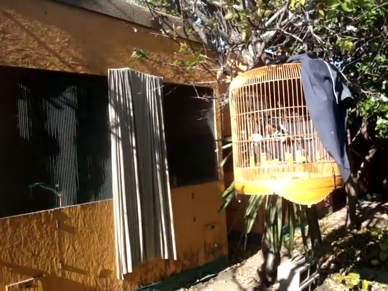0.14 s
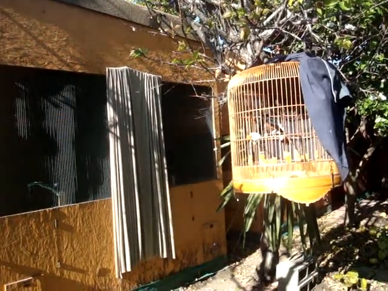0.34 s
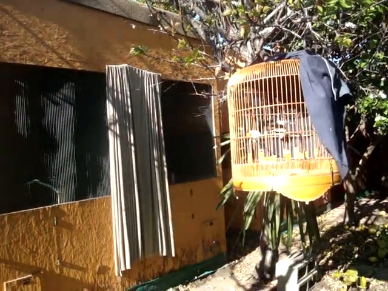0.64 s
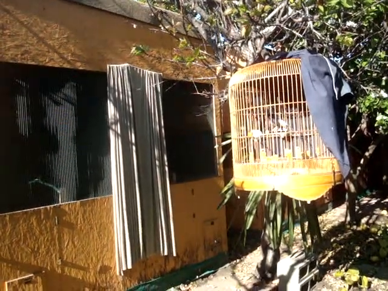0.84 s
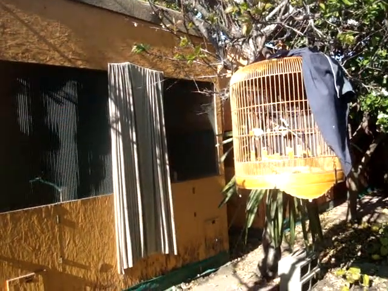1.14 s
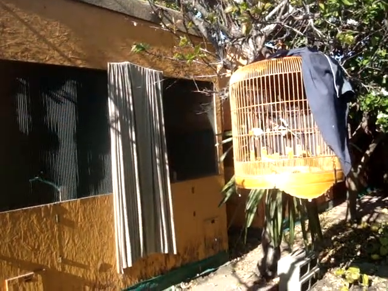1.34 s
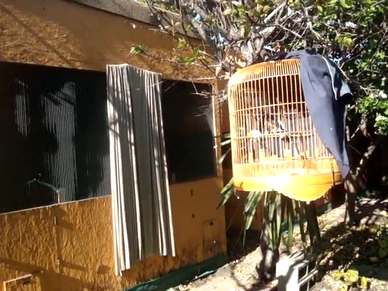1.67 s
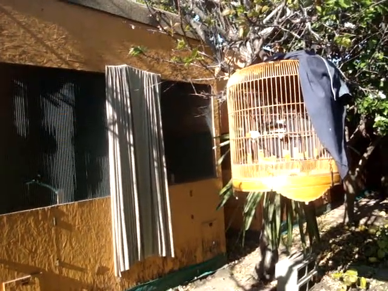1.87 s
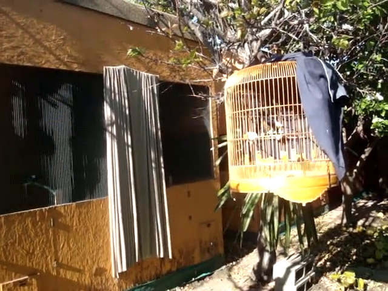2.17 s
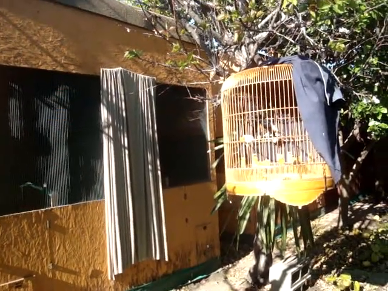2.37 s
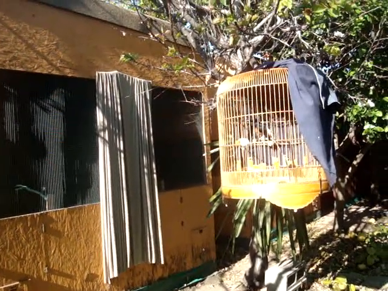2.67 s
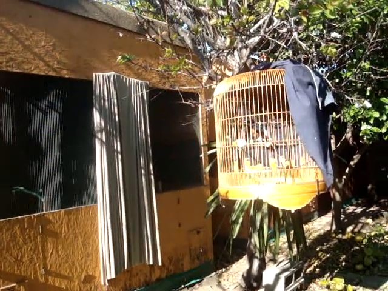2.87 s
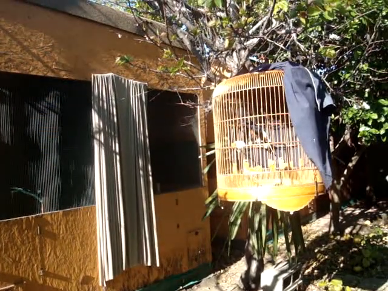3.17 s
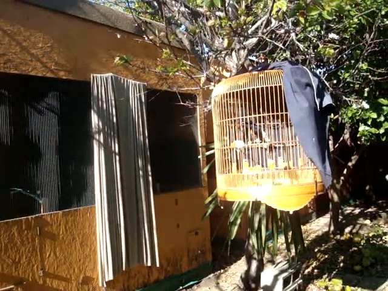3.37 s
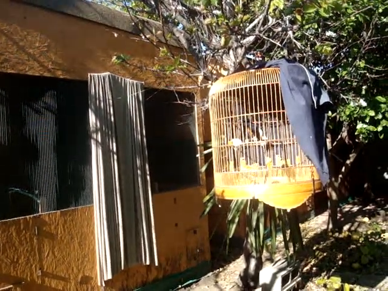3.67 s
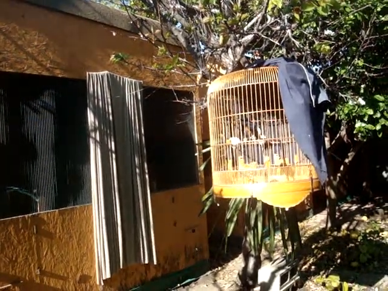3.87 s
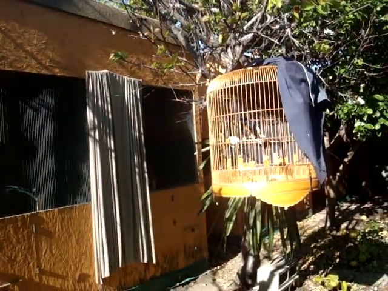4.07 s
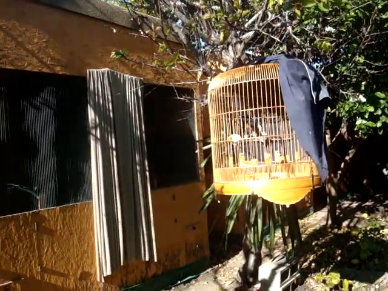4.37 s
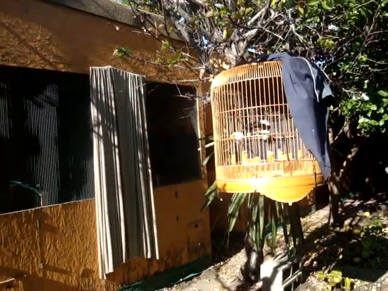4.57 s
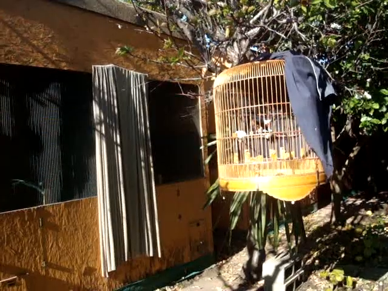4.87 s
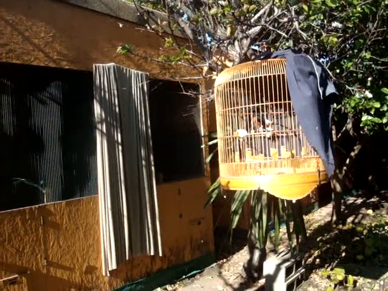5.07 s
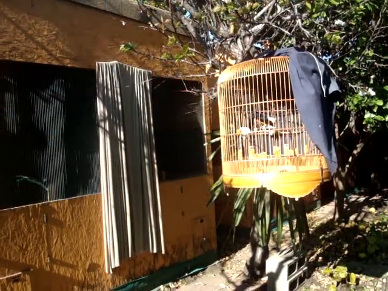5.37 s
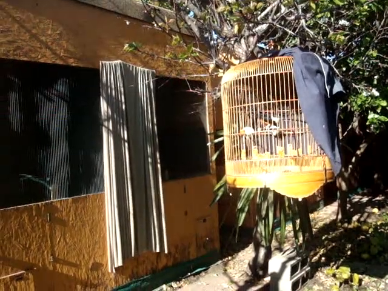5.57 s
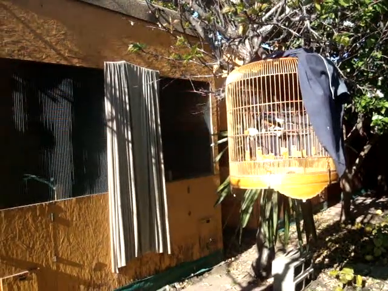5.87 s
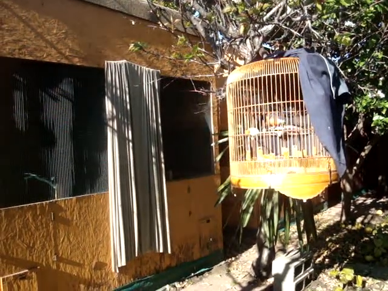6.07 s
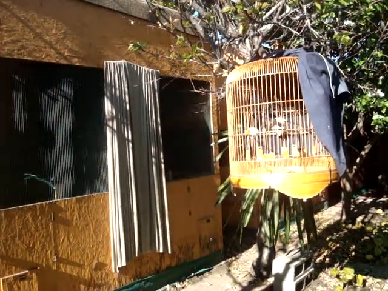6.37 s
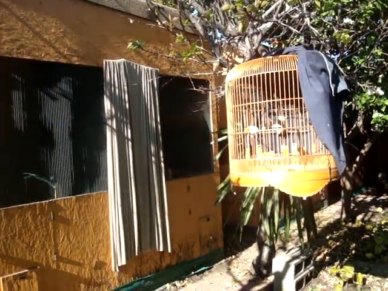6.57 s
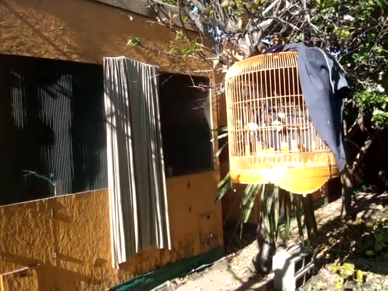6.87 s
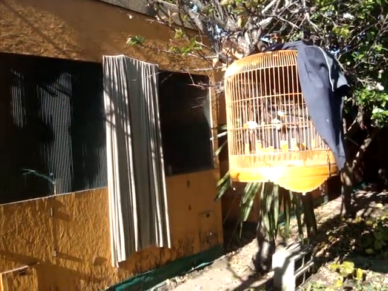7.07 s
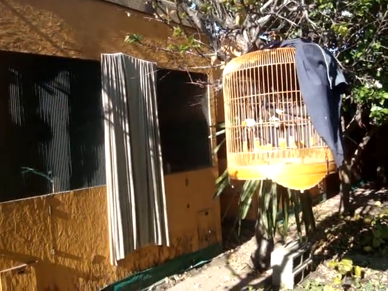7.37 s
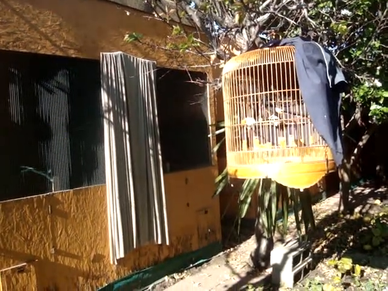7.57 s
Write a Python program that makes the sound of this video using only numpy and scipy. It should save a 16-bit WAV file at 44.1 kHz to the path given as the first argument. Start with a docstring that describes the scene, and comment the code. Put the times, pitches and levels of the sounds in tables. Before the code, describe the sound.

In a small walled yard, a caged songbird sings close and loud: round low hoots first, then a quick run of six arching whistles, later piercing high chirps. Harsh dry chacks punctuate throughout, with a tiny nasal squeak and brief purring trills. A high, breathy neighbour whistles falling hooks and slides; a mellow one swoops and coos. A quiet town hum with a thin whine lies underneath; walls give short echoes.

```python
"""A soft town hum with a thin whine, and a slow far whistle over it; then harsh chacks and a nasal squeak.
A high neighbour bird hooks and slides, a caged songbird hoots, arches, chirps and leaps, trills run,
and a mellow neighbour swoops and coos. Whistles are gliding near-pure tones; chacks are shaped noise.
Yard walls echo every bird sound; a fast limiter holds down the loudest notes."""
import sys
import numpy as np
from scipy import signal
from scipy.fft import rfft, irfft, next_fast_len
from scipy.io import wavfile
from scipy.ndimage import uniform_filter1d, minimum_filter1d, map_coordinates

SR = 44100
rng = np.random.default_rng(int(sys.argv[2]) if len(sys.argv) > 2 else 0)


def transcribe(signal):
    """Save signal, clipped to [-1, 1], as a 16-bit WAV file at the path in sys.argv[1]."""
    frames = np.atleast_2d(signal).T
    limited = np.clip(frames, -1, 1)
    pcm = np.round(limited * 32767).astype(np.int16)
    wavfile.write(sys.argv[1], SR, pcm)


N = 340893
HUM_DB = -48.5
BAND_LIMIT_HZ = 10350
DIP_KNOTS_PER_S = 85

# town hum spectrum: (frequency [Hz], relative level [dB])
HUM_SPECTRUM = [(12, -34), (20, -29), (101, -7.5), (312, -1.5), (374, -2.5), (632, -2.5), (985, -6),
                (1120, -7), (1280, -9), (1940, -10), (2950, -15.5), (7780, -19), (10400, -26),
                (13500, -68.5), (22000, -120)]
# steady whine: (centre [Hz], width [Hz], level [dB])
WHINE_BAND = (7575, 40, -68)
# slow far glides, one list each: (time [s], pitch [Hz], level [dB])
FAR_GLIDES = [
    [(0, 1655, -53), (.06, 1660, -55), (.13, 1660, -63)],
    [(.17, 1720, -63), (.2, 1780, -57), (.275, 1920, -57), (.35, 2075, -53), (.405, 2135, -49),
     (.46, 2190, -49), (.56, 2280, -48)],
    [(.68, 1580, -58), (.75, 1590, -52), (.815, 1570, -51), (.88, 1540, -51), (.96, 1500, -60)],
    [(5.88, 2330, -50), (6, 2310, -40), (6.075, 2260, -42), (6.15, 2165, -43), (6.3, 2080, -41),
     (6.45, 2015, -42), (6.525, 1980, -33), (6.595, 1950, -42)],
    [(7.57, 1900, -63), (7.645, 1865, -57), (7.75, 1820, -57)],
]
# chacks: (time [s], level before a common +10 dB [dB], rise [s], hold [s], gain up to 2.5 kHz [dB])
CHACK_CALLS = [(0.337, -30.5, 0.0018, 0.0046, -6.5), (0.5485, -37.5, 0.0021, 0.0074, -2),
               (0.823, -37.5, 0.0035, 0.021, -11), (1.026, -42.5, 0.005, 0.017, -3.5),
               (1.9582, -28.5, 0.0024, 0.035, -7), (3.574, -25.5, 0.0019, 0.00715, -8),
               (3.791, -30.5, 0.0022, 0.0046, 2), (4.165, -41, 0.0057, 0.035, -10),
               (4.2525, -37.5, 0.0028, 0.015, -11), (4.356, -44, 0.0032, 0.042, -8.5),
               (4.446, -44, 0.0045, 0.018, -4), (4.7377, -29.5, 0.0021, 0.016, -5),
               (5.178, -48.5, 0.0028, 0.042, -6), (5.3727, -33.5, 0.0039, 0.013, -2),
               (5.68, -56.5, 0.004, 0.0086, -10.5), (6.282, -30, 0.0039, 0.021, -5.5),
               (6.5882, -26.5, 0.0035, 0.0112, -10), (6.814, -29.5, 0.0026, 0.0056, -5)]
# colour of chacks and escaping air: (frequency [Hz], gain [dB])
RASP_COLOUR = [(350, -50), (600, -15), (1580, -4.5), (1840, -6.5), (2070, -5), (2510, -3.5), (3850, -6),
               (4140, -9.5), (6590, -11), (9540, -22), (10400, -36), (13500, -84.5), (22000, -120)]
# nasal rising squeak: (time [s], fundamental [Hz], level before summing overtones [dB])
SQUEAK_GLIDE = [(.722, 1074, -61.5), (0.738, 1307, -29), (0.753, 1522, -26.5), (.768, 1920, -34.5),
                (.778, 2064, -46)]
# trills: (time [s], length [s], low [Hz], high [Hz], mean sweep rate [1/s], level before puffs [dB])
TRILL_RUNS = [(1.333, 0.11, 631, 1660, 54, -41), (2.656, 0.14, 578, 1750, 39, -36.5),
              (4.67, 0.064, 2390, 3200, 63, -40.5)]
# throat and beak gain on overtones: (overtone frequency [Hz], gain [dB])
BEAK_GAIN = [(1500, -32), (2300, -29), (3500, -37), (4600, -46), (5500, -52), (7000, -50), (8600, -34),
             (10500, -33)]
# near voice flutters more on high pitches: (pitch [Hz], depth [dB])
NEAR_FLUTTER = [(1000, -0.5), (2300, 3.5), (4200, 5)]
# tail decay: (frequency [Hz], t60 [s])
YARD_DECAY = [(800, 0.33), (2500, 0.33), (5000, 0.26), (10000, 0.13)]
# first echoes: (delay [s], level before each source's wall level [dB])
WALL_ECHOES = [(.004, -0.5), (.011, -2.5), (.019, -5), (.03, -13.5), (.043, -12.5)]

# Notes: a pitch arc through a turn, usually its top.
# *_NOTES: (turn time [s], rise [s], fall [s], first [Hz], turn [Hz], last [Hz],
#           level before shape [dB], change by the end [dB])
# *_SHAPE, three rows: place [-1 start, 0 turn, 1 end], share of the way from turn to end pitch [0-1],
#           level [dB]
# high neighbour
HOOK_NOTES = [(1.155, 0.065, 0.073, 2916, 3330, 2480, -29, -8),
              (1.155, 0.035, 0.04, 3450, 4000, 3270, -49.5, 4),
              (1.371, 0.075, 0.078, 3027, 3314, 2260, -28, -13),
              (1.587, 0.09, 0.061, 3010, 3440, 2380, -31.5, -4),
              (4.85, 0.064, 0.082, 3335, 3420, 2020, -47.5, 4.5),
              (5.066, 0.047, 0.014, 3730, 4320, 3370, -42.5, -23)]
HOOK_SHAPE = ([-1, -.55, -.25, 0, .15, .4, .65, 1], [1, .35, .07, 0, .2, .72, .93, 1], [-5, 2, 0, -2, 0, 2,
              -1, -2])
SLIDE_NOTES = [(1.235, 0.0091, 0.23, 3140, 3140, 2250, -42, -13),
               (1.795, 0.0062, 0.15, 4100, 3785, 2275, -47.5, 2.5),
               (2.082, 0.0064, 0.18, 3870, 3781, 2286, -46.5, 6)]
SLIDE_SHAPE = ([-1, 0, .15, .35, .6, 1], [1, 0, .4, .68, .88, 1], [-6, -2, 0, 0, 0, -3])
HUMP_NOTES = [(2.43, .048, 0.033, 2414, 3200, 2540, -46, -8),
              (2.615, 0.066, 0.054, 2250, 3130, 2300, -49.5, 0),
              (2.79, 0.037, 0.038, 2420, 3180, 2430, -50.5, -5),
              (5.08, .085, .115, 2060, 3010, 2260, -48.5, -3),
              (5.35, 0.071, 0.11, 2353, 3030, 2300, -47.5, -6.5)]
HUMP_SHAPE = ([-1, -.7, -.35, 0, .2, .4, .65, 1], [1, .8, .3, 0, .3, .75, .93, 1], [4, 9, 3, -3, 1, 5, 3,
              0])
# caged bird
HOOT_NOTES = [(1.203, 0.039, 0.036, 924, 1150, 864, -13.5, -14),
              (2.252, 0.045, 0.033, 870, 1181, 924, -12.5, -11),
              (2.525, .045, 0.033, 910, 1151, 914, -11.5, -15.5)]
HOOT_SHAPE = ([-1, -.55, -.25, 0, .3, .65, 1], [1, .5, .18, 0, .1, .4, 1], [-22, -10, -7, 0, -1, -2, 0])
ARCH_NOTES = [(3.423, 0.071, 0.042, 982, 1772, 817.5, -13.5, 1.5),
              (3.55, 0.033, 0.036, 766, 1895, 772, -7.5, -5),
              (3.665, 0.025, 0.04, 1416, 2126, 891, -6, -6.5),
              (3.774, 0.044, .041, 1457, 2274, 987, -6, -14), (3.916, .03, .05, 1813, 2270, 1088, -9, -6.5),
              (4.066, .037, 0.037, 2012, 2294, 1350, -9.5, -3)]
ARCH_SHAPE = ([-1, -.75, -.5, -.25, 0, .25, .5, .75, 1], [1, .7, .35, .09, 0, .08, .36, .7, 1], [-24, -16,
              -10, -4, 0, -3, -9, -7, -11])
CHIRP_NOTES = [(6.522, .026, 0.021, 3730, 4246, 4240, -10, -18.5),
               (6.588, 0.0074, .04, 4990, 4730, 4584, -8, -19.5),
               (6.59, .006, 0.051, 3090, 3150, 2995, -32.5, -2.5),
               (6.656, .006, 0.068, 5140, 5210, 4610, -19.5, -9),
               (6.666, .008, .074, 3290, 3153, 2727, -18.5, -12),
               (7.318, 0.0099, 0.026, 4280, 4452, 4500, -22, 0.5),
               (7.39, .008, 0.025, 5180, 4930, 4430, -12.5, -21),
               (7.434, .006, .018, 5010, 4800, 4800, -35, 8),
               (7.464, 0.0066, 0.047, 5420, 5320, 4885, -26, 4.5)]
CHIRP_SHAPE = ([-1, -.5, 0, .2, .45, .7, 1], [1, .3, 0, .2, .5, .75, 1], [-24, -8, 0, -1, -4, -1, -3])
LEAP_NOTES = [(7.278, 0.039, 0.017, 2520, 3040, 2800, -47, -10),
              (7.279, 0.0084, .019, 4930, 5610, 3720, -40.5, -1),
              (7.4, .013, .024, 4100, 2380, 3750, -47, 2),
              (7.468, 0.026, 0.0542, 2185, 3577, 2900, -29.5, 7),
              (7.694, 0.017, .026, 2224, 3140, 2900, -39, -19),
              (7.699, .02, 0.017, 4400, 5480, 4130, -39.5, 2)]
LEAP_SHAPE = ([-1, -.6, -.3, 0, .3, .6, 1], [1, .4, .08, 0, .15, .6, 1], [-16, -12, -6, 0, -2, 0, -3])
# mellow neighbour
SWOOP_NOTES = [(1.675, 0.073, 0.096, 1365, 1739, 1163, -27.5, -1.5),
               (2.315, 0.096, 0.065, 1415, 1734, 1104, -26, -14),
               (2.885, 0.12, 0.077, 1454, 1707, 1210, -29.5, 0.5),
               (3.292, .092, 0.083, 1336, 1663, 1035, -28.5, -9),
               (4.045, 0.062, 0.1, 1596, 1755, 1456, -24, -4.5)]
SWOOP_SHAPE = ([-1, -.75, -.5, -.2, 0, .12, .3, .55, 1], [1, .5, .15, .02, 0, .1, .6, .97, 1], [-18, -12,
               -8, -3, 0, 0, -3, -3, -1])
COO_NOTES = [(4.415, 0.087, 0.083, 1426, 1699, 1330, -29.5, 0.0043),
             (4.715, 0.094, 0.081, 1520, 1654, 1547, -29, 0),
             (4.98, 0.097, 0.064, 1510, 1652, 1550, -31, 0),
             (5.25, 0.093, 0.067, 1533, 1655, 1514, -30, 0.004),
             (5.53, 0.091, 0.092, 1490, 1662, 1530, -32, 0.017),
             (5.82, 0.076, .08, 1515, 1650, 1604, -32.5, 0), (6.08, .08, .08, 1517, 1679, 1378, -34, 0),
             (6.31, 0.076, 0.05, 1500, 1640, 1440, -34.5, 0.006),
             (6.51, 0.09, 0.041, 1570, 1644, 1340, -37.5, 0)]
COO_SHAPE = ([-1, -.6, -.3, 0, .35, .65, 1], [1, .3, .08, 0, .08, .35, 1], [-16, -6, -4, -1, 4, -4, -15])


def amp(db):
    """Amplitude factor of a level in dB."""
    return 10 ** (np.asarray(db) / 20)


def unit(x):
    """Scale to rms 1."""
    return x / np.sqrt(np.mean(x ** 2) + 1e-20)


def along(points, hz):
    """Interpolate (Hz, value) points on a log frequency axis."""
    f, v = np.transpose(points)
    return np.interp(np.log(hz + 1), np.log(f + 1), v)


def filtered(x, response):
    """Apply a zero-phase gain, given as a function of Hz."""
    m = next_fast_len(len(x) + 8192)
    return irfft(rfft(x, m) * response(np.fft.rfftfreq(m, 1 / SR)), m)[:len(x)]


def wobble(n, knots_per_s):
    """Smooth random curve through Gaussian knots."""
    knots = rng.standard_normal(int(n * knots_per_s / SR) + 4)
    return map_coordinates(knots, [np.arange(n) * knots_per_s / SR])


def add(track, s, sound):
    """Mix a sound into the track at time s."""
    part = track[max(round(s * SR), 0):][:len(sound)]
    part += sound[:len(part)]


def background():
    """Town hum: coloured noise, gently breathing; whine: narrow-band noise."""
    hum = unit(filtered(rng.standard_normal(N), lambda hz: amp(along(HUM_SPECTRUM, hz))))
    centre_hz, width_hz, whine_db = WHINE_BAND
    whine = filtered(rng.standard_normal(N), lambda hz: np.exp(-((hz - centre_hz) / width_hz) ** 2))
    return amp(HUM_DB + 0.12 * wobble(N, 1.6)) * hum + amp(whine_db) * unit(whine)


def syrinx(hz, overtones_db):
    """Sine of rms 1 plus faint, fuzzy overtones coloured by throat and beak."""
    phase = 2 * np.pi * (np.cumsum(hz) / SR + rng.random())
    tone = np.sin(phase)
    for k in range(2, 9):
        fuzz_db = (0.83 * k + hz / 2500) * wobble(len(hz), 640) - 2.46 * k
        gain = amp(overtones_db + along(BEAK_GAIN, k * hz) + fuzz_db)
        tone += gain * np.sin(k * phase) * (k * hz < SR / 2)
    return np.sqrt(2) * tone


def buzz(n, depth):
    """Uneven pulsing at about 115 Hz, with a random rasp on top."""
    rate_hz = 115 * (1 + 0.26 * wobble(n, 79.0))
    pulses = np.cos(2 * np.pi * (np.cumsum(rate_hz) / SR + rng.random()))
    return (1 + depth * pulses) * (1 + 0.73 * depth * wobble(n, 1082))


def duet_depth(notes, duet_buzz):
    """Buzz depth over time: both sides of the syrinx fight for air where strong notes overlap."""
    voices = np.zeros(N + SR)
    for note in notes:
        start_s, end_s = note[0][0], note[-1][0]
        strong = max(db for *_, db in note) > -27
        add(voices, start_s, np.full(round((end_s - start_s) * SR), strong))
    return duet_buzz * uniform_filter1d(1.0 * (voices > 1), size=300)


def song(notes, overtones_db, breath_db, waver, flutter, overhang_s, smooth_samples, duet_buzz, dip_depth_db):
    """Whistles: rounded pitch arcs, unsteady in pitch, briefly dipping in level, with escaping air."""
    out, air = np.zeros(N), np.zeros(N + SR)
    duet = duet_depth(notes, duet_buzz)
    for note in notes:
        s, hz, db = np.transpose(note)
        t = np.arange(s[0] - overhang_s, s[-1] + overhang_s, 1 / SR)
        n = len(t)
        pitch_hz = uniform_filter1d(np.interp(t, s, hz), size=300, mode="nearest")
        level_db = uniform_filter1d(np.interp(t, s, db), size=smooth_samples, mode="nearest")
        # dips are shallowest at full strength
        dips = np.clip(wobble(n, DIP_KNOTS_PER_S), 0, 2) ** 2
        dip_db = -dip_depth_db * dips * np.clip((level_db.max() - level_db) / 8, .2, 1)
        fade = np.clip(np.minimum(t - t[0], t[-1] - t) / (2 * overhang_s), 0, 1) ** 2
        rough = np.clip(duet[max(round(t[0] * SR), 0):][:n], 0, 1)
        flutter_db = along(flutter, pitch_hz) * wobble(n, 233.8)
        strength = amp(dip_db) * fade * amp(level_db + flutter_db) * buzz(n, rough)
        shine_db = overtones_db - 0.21 * (level_db - 14)  # louder is purer
        wavering_hz = pitch_hz * (1 + waver * (1 + 2 * rough) * wobble(n, 309.2))
        add(out, t[0], strength * syrinx(wavering_hz, shine_db))
        puff = (pitch_hz / 3000) ** 1.5 * (1 + 6 * rough) * rng.standard_normal(n)
        add(air, t[0], strength * puff)
    return out + amp(breath_db) * filtered(air[:N], lambda hz: amp(along(RASP_COLOUR, hz)))


def arcs(rows, shape):
    """Stretch one note shape over each row; curves of (s, pitch Hz, level dB)."""
    place, share, swell_db = np.array(shape)
    after = place > 0
    curves = []
    for turn_s, rise_s, fall_s, first_hz, turn_hz, last_hz, db, change_db in rows:
        s = turn_s + place * np.where(after, fall_s, rise_s)
        hz = turn_hz - share * (turn_hz - np.where(after, last_hz, first_hz))
        curves.append(np.transpose([s, hz, db + swell_db + change_db * place * after]))
    return curves


def far_whistle():
    """Thin slow whistle: steady glides with weak overtones and little air."""
    return song(FAR_GLIDES, -8, breath_db=-41, waver=.0015, flutter=[(2000, 0.94)],
                overhang_s=.01, smooth_samples=2000, duet_buzz=0, dip_depth_db=0)


def chacks():
    """Harsh calls: a burst of breathy, spiky noise that rises, holds and dies fast."""
    out, t = np.zeros(N), np.arange(SR // 8) / SR
    scale = np.sqrt(np.mean(amp(along(RASP_COLOUR, np.arange(100, 10000, 100))) ** 2))
    for s, db, rise_s, hold_s, low_db in CHACK_CALLS:
        spiky = unit(rng.standard_normal(len(t)) * amp(3.7 * wobble(len(t), 893)))
        tilt = [(2500, low_db), (5000, 0.022)]
        coloured = filtered(spiky, lambda hz: amp(along(RASP_COLOUR, hz) + along(tilt, hz))) / scale
        rise = np.clip(t / rise_s, 0, 1) ** 2
        decay = amp(-60 * np.clip(t - rise_s - hold_s, 0, None) / 0.055)  # 60 dB in 55 ms
        add(out, s - .002, amp(db + 10.0) * rise * decay * coloured)
    return out


def squeak():
    """Short upward glide, carried by harmonics 2 to 7 and rasp without its fundamental."""
    s, hz, db = np.transpose(SQUEAK_GLIDE)
    t = np.arange(s[0], s[-1], 1 / SR)
    phase = 2 * np.pi * np.cumsum(np.interp(t, s, hz) * (1 + 0.02 * wobble(len(t), 426))) / SR
    tone = np.zeros(len(t))
    for k, overtone_db in enumerate([0, -1.5, -9, -15, -16, -17], start=2):
        tone += amp(overtone_db + 3 * wobble(len(t), 280)) * np.sin(k * phase)
    noise = rng.standard_normal(len(t))
    rasp = unit(filtered(noise, lambda f: amp(along(RASP_COLOUR, f)) * (f > 2000)))
    out = np.zeros(N)
    add(out, s[0], amp(np.interp(t, s, db)) * (tone + .5 * rasp))
    return out


def high_bird():
    """High neighbour: breathy hooks and slides, and hoarse humps with a stronger pitch waver."""
    clear = song(arcs(HOOK_NOTES, HOOK_SHAPE) + arcs(SLIDE_NOTES, SLIDE_SHAPE), 0.73,
                 breath_db=-20.5, waver=0.012, flutter=[(3000, 2.2)],
                 overhang_s=.006, smooth_samples=300, duet_buzz=0, dip_depth_db=5.5)
    hoarse = song(arcs(HUMP_NOTES, HUMP_SHAPE), 0, breath_db=-22, waver=.045, flutter=[(3000, 3)],
                  overhang_s=.006, smooth_samples=300, duet_buzz=0, dip_depth_db=5)
    return clear + hoarse


def two_voices(x, coupling_db):
    """The syrinx sides share one airflow: squaring adds sum tones and octaves, kept above 5 kHz."""
    size = np.sqrt(np.abs(uniform_filter1d(x ** 2, size=200)) + 1e-8)
    mixed = filtered(x ** 2 / size, lambda hz: np.clip((hz - 5000) / 2500, 0, 1))
    return x + amp(coupling_db) * mixed


def caged_bird():
    """Loud near voice: hoots, arches, chirps and leaps, buzzing where strong notes overlap."""
    notes = arcs(HOOT_NOTES, HOOT_SHAPE) + arcs(ARCH_NOTES, ARCH_SHAPE)
    notes += arcs(CHIRP_NOTES, CHIRP_SHAPE) + arcs(LEAP_NOTES, LEAP_SHAPE)
    whistles = song(notes, 4, breath_db=-33, waver=.004, flutter=NEAR_FLUTTER,
                    overhang_s=.002, smooth_samples=200, duet_buzz=.75, dip_depth_db=5)
    return two_voices(whistles, coupling_db=-20.5)


def trills():
    """Quick, breathy upward sweeps in a row, each its own little puff."""
    out = np.zeros(N)
    for s, length_s, low_hz, high_hz, sweeps_per_s, db in TRILL_RUNS:
        t = np.arange(0, length_s, 1 / SR)
        n, span_hz = len(t), high_hz - low_hz
        turn = (t * sweeps_per_s + 0.184 * wobble(n, 30)) % 1
        hz = (low_hz + span_hz * turn) * (1 + 0.0762 * wobble(n, 360.0))
        band = lambda f: np.exp(-((2 * f - low_hz - high_hz) / span_hz) ** 2)
        air = unit(filtered(rng.standard_normal(n), band))
        edges = np.clip(np.minimum(t + 0.0084, length_s - t) / 0.016, 0, 1)
        puffs = np.sin(np.pi * turn) ** 2 * edges
        add(out, s, amp(db + 2 * wobble(n, 60)) * puffs * (.85 * syrinx(hz, 3) + .45 * air))
    return out


def mellow_bird():
    """Mellow neighbour: swoops and coos with soft edges and weaker overtones."""
    return song(arcs(SWOOP_NOTES, SWOOP_SHAPE) + arcs(COO_NOTES, COO_SHAPE), -3.8,
                breath_db=-37.5, waver=0.0074, flutter=[(1600, 0.81)],
                overhang_s=.008, smooth_samples=900, duet_buzz=0, dip_depth_db=4.5)


def yard(x, walls_db, tail_db):
    """Direct sound, first wall echoes and a diffuse tail whose treble dies first."""
    hz, t, z = signal.stft(rng.standard_normal(SR * 2 // 3), SR, nperseg=256)
    decay = amp(-60 * t / along(YARD_DECAY, hz)[:, None])
    tail = signal.istft(z * decay, SR, nperseg=256)[1]
    tail *= np.clip(np.arange(len(tail)) / SR / 0.018, 0, 1)  # scattering builds up
    answer = amp(tail_db) * tail / np.linalg.norm(tail)
    answer[0] = 1
    for delay_s, db in WALL_ECHOES:
        answer[round(delay_s * SR)] += amp(db + walls_db) * rng.choice([-1, 1])
    return signal.fftconvolve(x, answer)[:N]


def scene():
    """Each group of birds in its own yard echo, over the dry background."""
    birds = yard(far_whistle(), walls_db=-9, tail_db=-11)
    birds += yard(chacks() + squeak(), walls_db=-8.5, tail_db=-10.5)
    birds += yard(high_bird() + trills(), walls_db=4.0, tail_db=-2.0)
    birds += yard(caged_bird(), walls_db=-5, tail_db=-12)
    birds += yard(mellow_bird(), walls_db=-4.5, tail_db=-4.5)
    return (background() + birds)[None]


def record(dry):
    """Fast limiter that thumps as it bites, then a band limit."""
    envelope = np.abs(signal.hilbert(dry[0], next_fast_len(N))[:N])
    needed = np.minimum(1, 0.67 / (envelope + 1e-9))
    gain = uniform_filter1d(minimum_filter1d(needed, size=90), size=20)
    jolts = 0.24 * np.diff(1 - gain, prepend=0).clip(0)  # each drop in gain jolts the baseline
    thump = signal.lfilter([1], [1, -np.exp(-1 / (0.00061 * SR))], jolts)  # 0.61 ms decay
    return filtered(gain * dry[0] + thump, lambda hz: np.clip((BAND_LIMIT_HZ - hz) / 350, 0, 1))[None]


dry = scene()
out = record(dry)
transcribe(out)
```